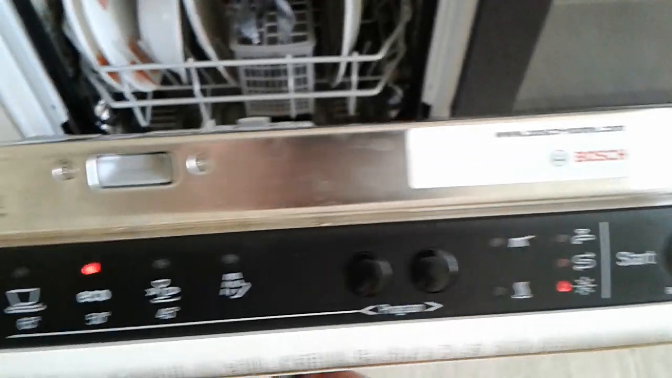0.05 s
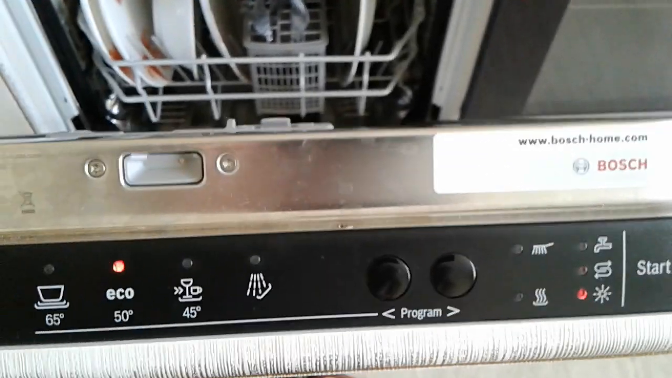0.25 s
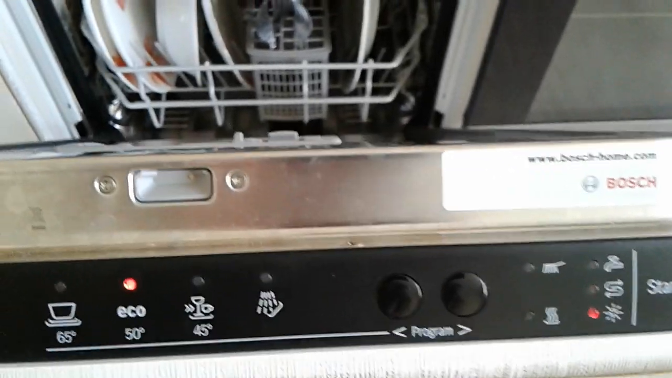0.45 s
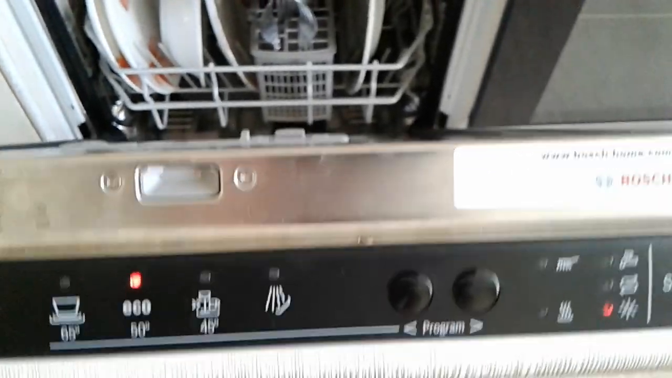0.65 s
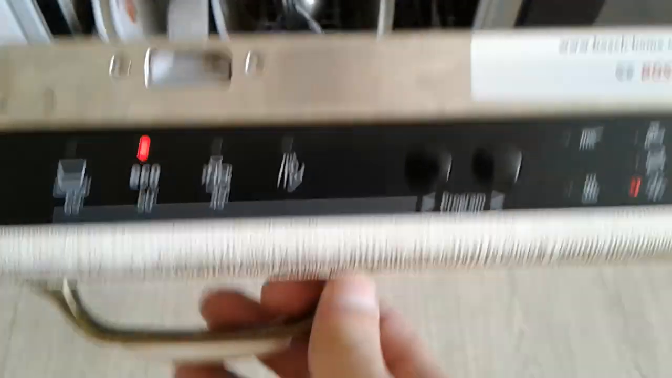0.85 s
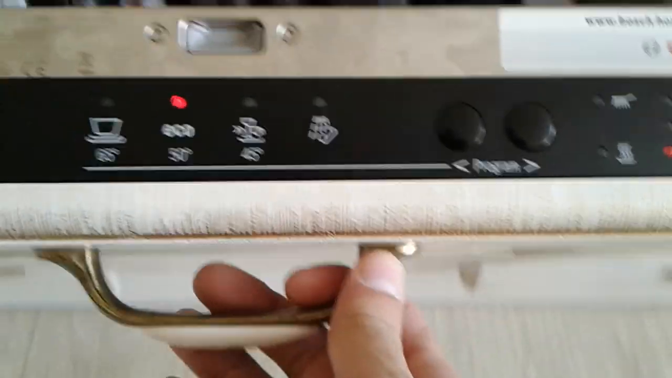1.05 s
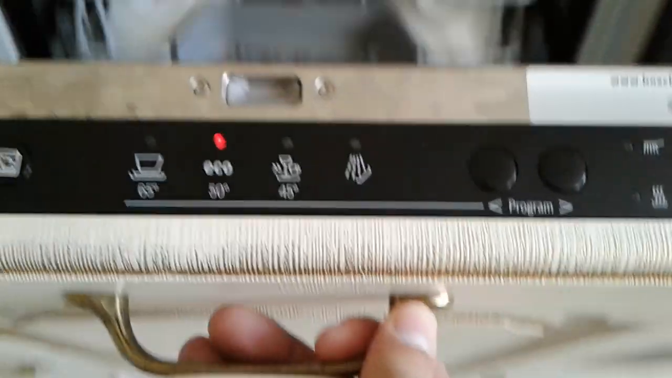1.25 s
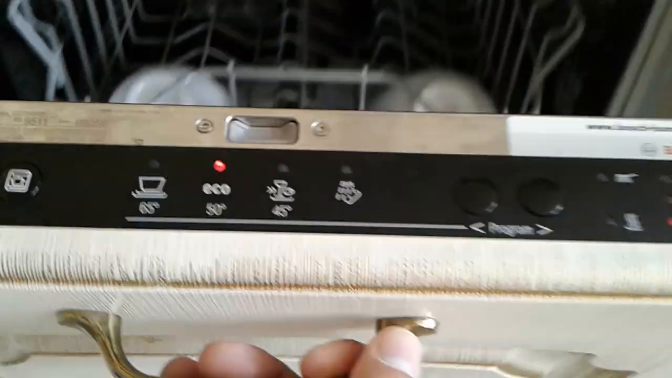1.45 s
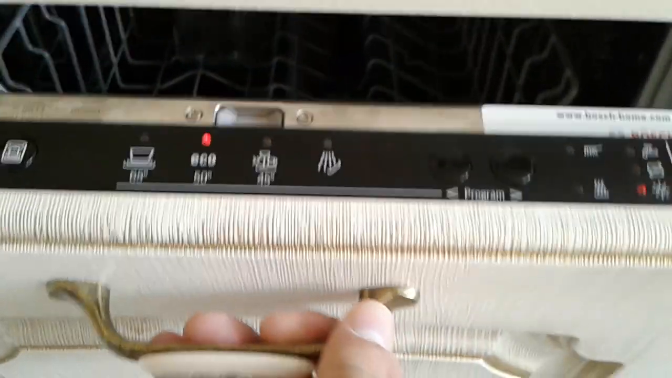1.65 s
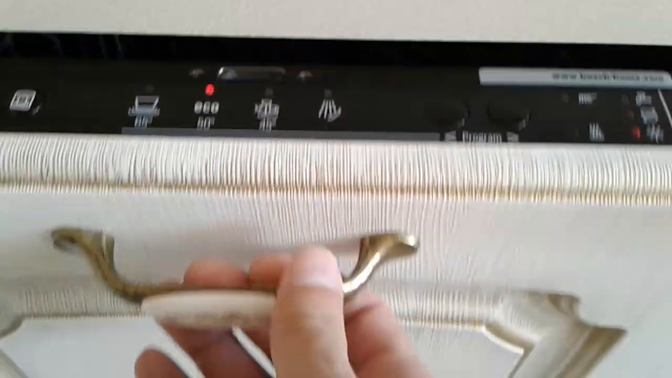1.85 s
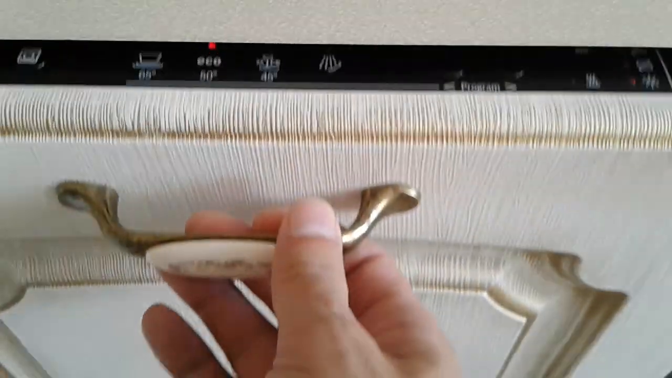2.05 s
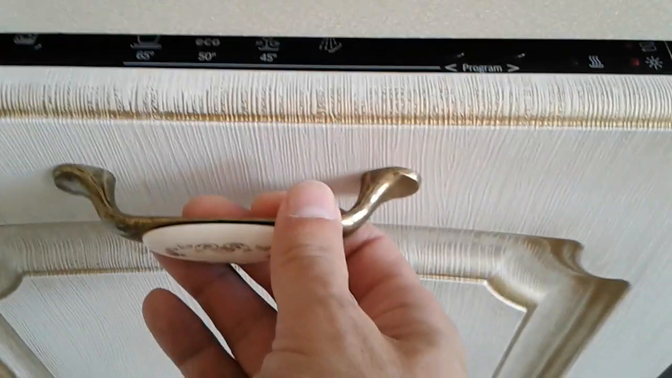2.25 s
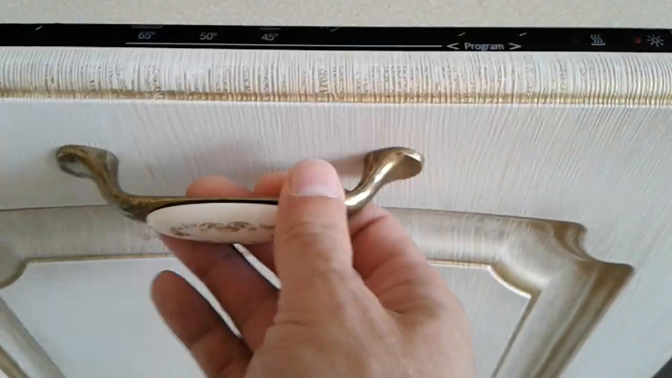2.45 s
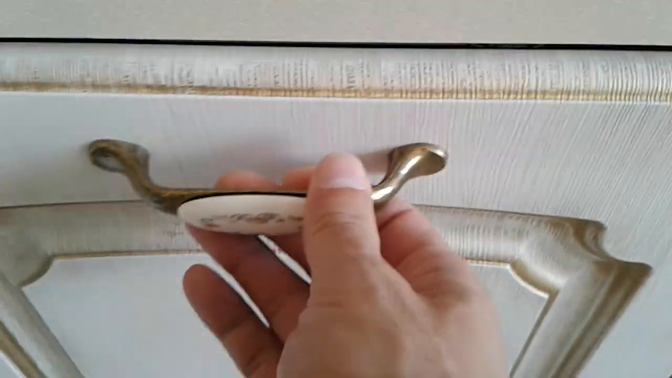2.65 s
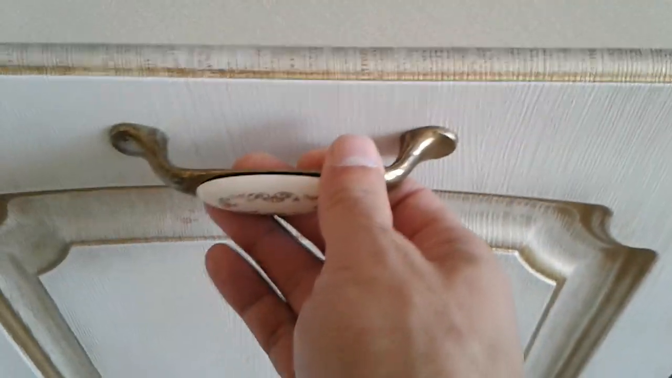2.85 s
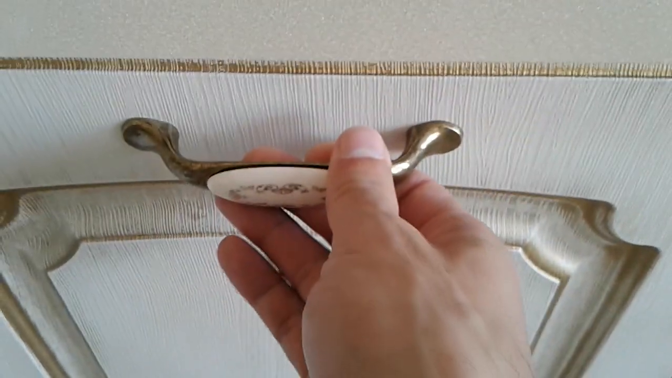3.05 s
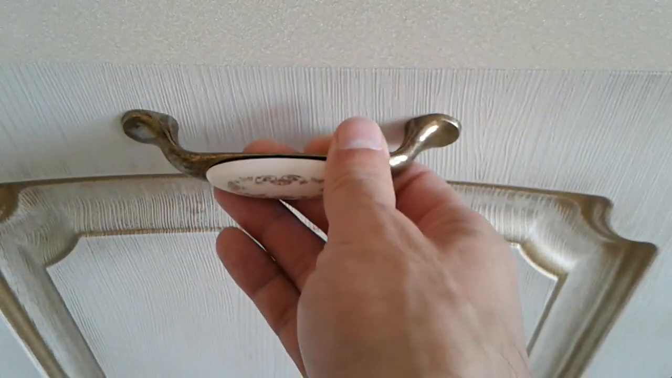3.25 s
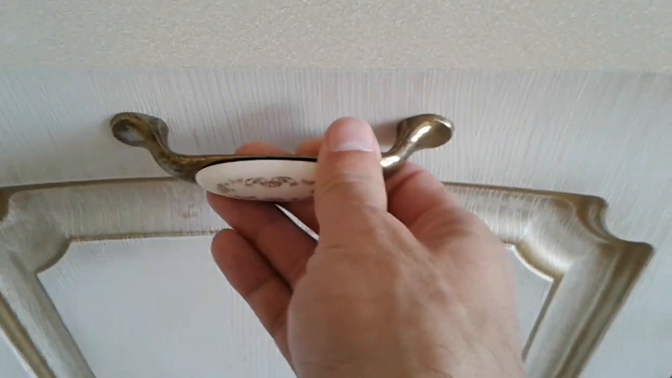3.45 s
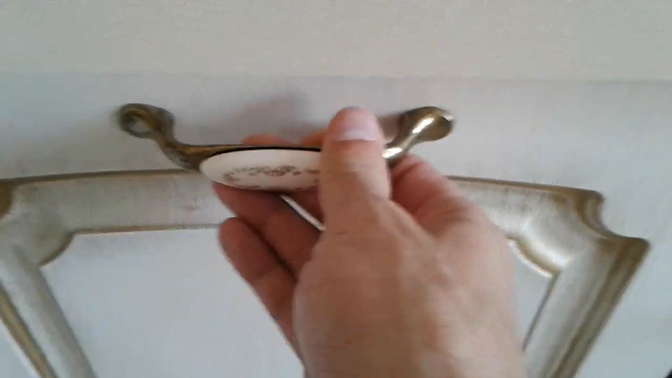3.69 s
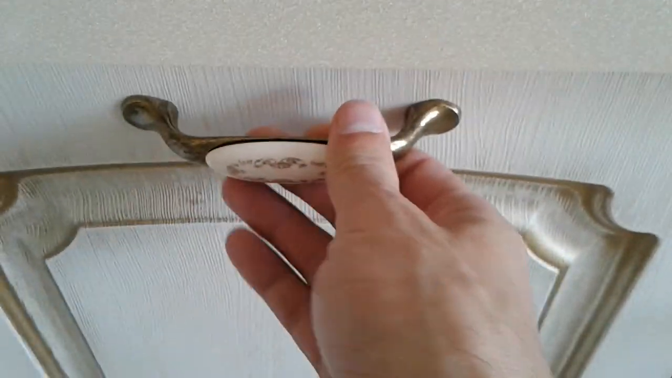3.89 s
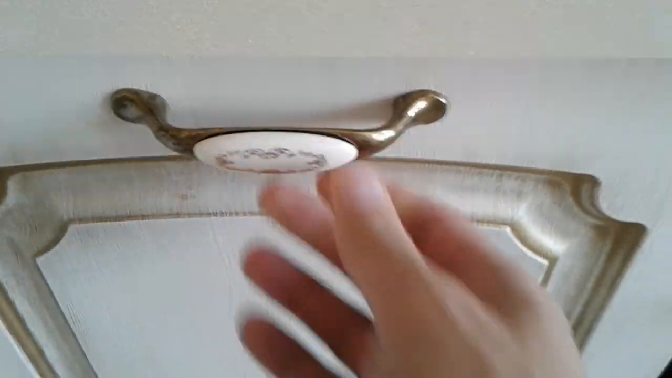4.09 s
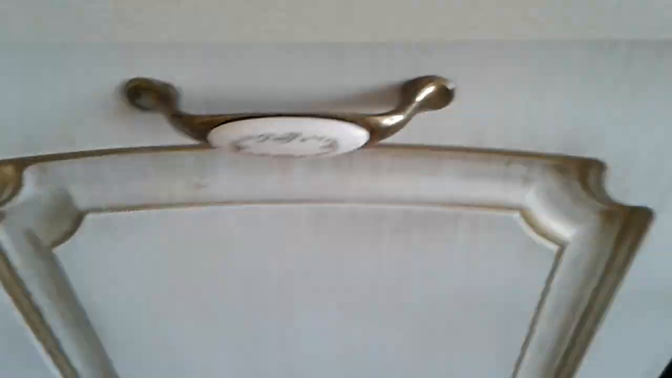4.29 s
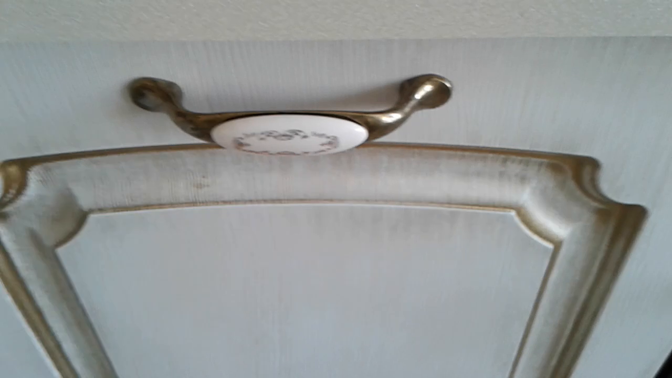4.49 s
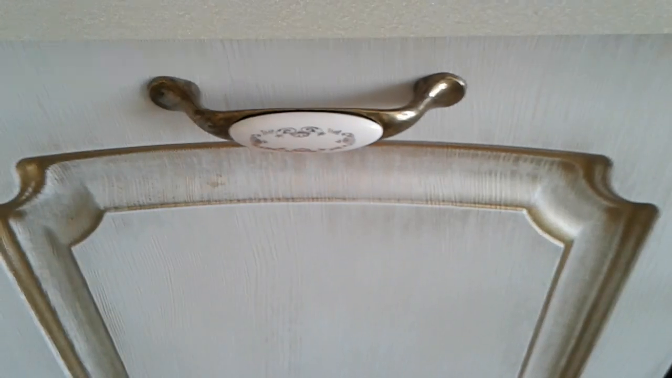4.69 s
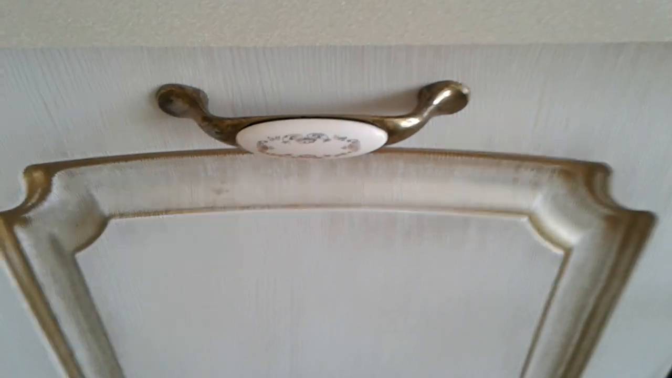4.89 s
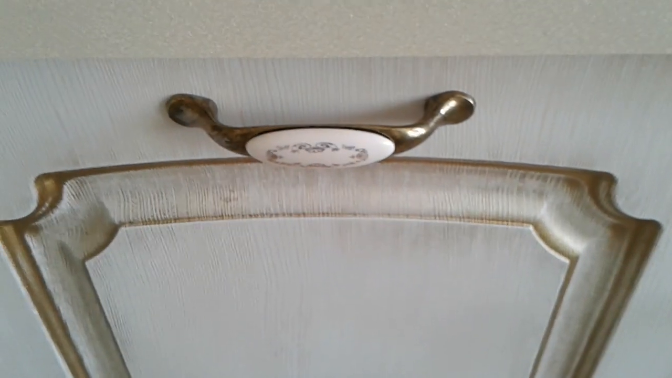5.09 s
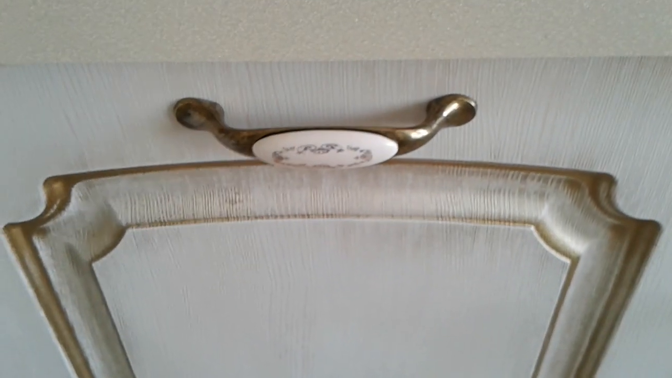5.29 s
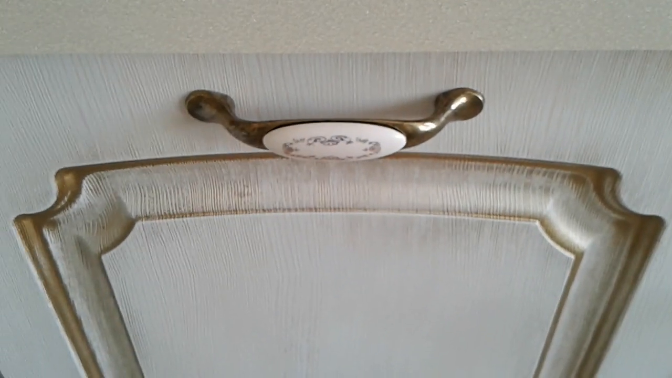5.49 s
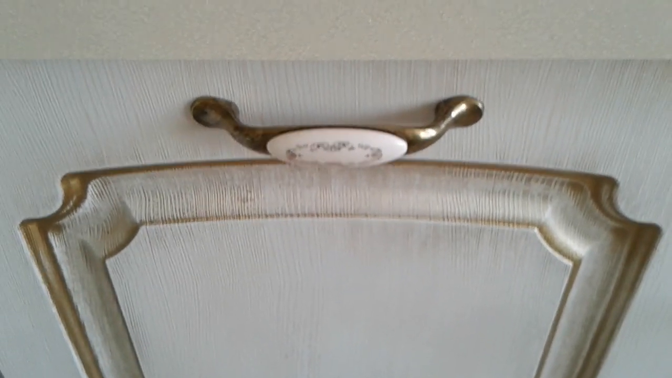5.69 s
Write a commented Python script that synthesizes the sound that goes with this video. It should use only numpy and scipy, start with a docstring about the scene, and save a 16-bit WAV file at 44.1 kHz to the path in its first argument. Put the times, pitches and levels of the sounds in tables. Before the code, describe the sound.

Dull double thump on a door panel, quiet creaky bumps, then a hard latch snap and booming clank, fading to soft rustles.

```python
"""In a small kitchen, a dishwasher door is lifted by its handle and pushed shut, close to a phone.
Knocks are short falling thumps that ring the panel; catch, racks and handle tick and scrape as tiny impacts.
The latch snaps as brief sines and the door lands as noise bursts that ring the steel tub; racks sway and sing on.
A hand rustles in filtered noise, over wavering hum tones and a shaped rush of air and hiss.
The phone's gain control ducks at loud peaks such as the slam and creeps back."""
import sys
import numpy as np
from scipy import signal
from scipy.fft import rfft, irfft
from scipy.io import wavfile
from scipy.ndimage import minimum_filter1d

SR = 44100
rng = np.random.default_rng(int(sys.argv[2]) if len(sys.argv) > 2 else 0)


def store_wav(level_fs):
    """Save 16-bit WAV to argv[1]."""
    pcm = np.round(np.clip(np.atleast_2d(level_fs), -1, 1) * 32767)
    wavfile.write(sys.argv[1], SR, pcm.T.astype(np.int16))


N = 252693
T = np.arange(N) / SR  # time [s]
RING_T = T[:SR]  # the first second, for room echoes

# the door lands and chatters: (time [s], level [dB], contact length [s], tub ring relative to the blow [dB])
LANDINGS = [(3.5882, 14, 0.0028, -2), (3.6025, 5.5, 0.0088, -4), (3.6127, 10, 0.0033, -2.5),
            (3.6327, 6.5, 0.0034, 0.5), (3.658, 1.5, 0.0015, -0.5), (3.675, -2.5, 0.0015, -5)]
# colour of the landing blows: (frequency [Hz], relative level [dB])
LANDING_COLOUR = [(40, -29), (200, -13), (650, -6), (850, -2), (1050, 5), (1600, 1), (2000, -8.5),
                  (3000, -14.5), (3700, -10.5), (4400, -14), (5200, -10.5), (6600, -21.5), (8800, -15.5),
                  (11500, -37), (15000, -32.5)]
# the latch snaps over: (frequency [Hz], relative level [dB], time to fall 60 dB [s])
SNAP_S = 3.5878
SNAP_MODES = [(1120, 7, .0055), (2940, -3, .004), (4117, 1.5, 0.0033), (5180, 2.5, 0.0027),
              (8644, -1.5, .003), (14580, -12, .002)]
# steel tub and frame: (frequency [Hz], relative level [dB], time to fall 60 dB [s])
TUB_MODES = [(337, -7, .4), (404, -12.5, .3), (458.4, -4.5, 0.23), (530, -11, 0.54), (840, -10.5, .33),
             (954, -6.5, 0.18), (1001, -8, 0.3), (1103, -4, 0.19), (1118.5, 2, 0.33), (1218, -9.5, 0.37),
             (1326, -3.5, 0.35), (1380, -8, .27), (1417.4, 2.5, .28), (1447, -4.5, 0.38), (1555, -11, .28),
             (1690, -13.5, .23), (1834, -17, .3), (2040, -13, 0.33), (2670, -17, .35), (3600, -13, .38),
             (4070, -14.5, 0.25), (5060, -14.5, .27), (5340, -23.5, .36)]
# the whole cabinet rocks in its niche: (frequency [Hz], level [dB], time to fall 60 dB [s])
CABINET_S = 3.603
CABINET_MODES = [(40.77, -29, .26), (50.1, -30, 0.21), (75.4, -35, 0.75), (109.3, -23, 0.37),
                 (162.5, -40, 0.94), (260.1, -22.5, .3)]


def slam(tub_db=0.0, snap_rise_s=.001, snap_db=5, wet_db=0.06):
    """The latch snaps over and the door lands; every blow rings the steel tub, and the cabinet rocks."""
    force, snap, body = np.zeros((3, N))
    add(snap, SNAP_S, undb(snap_db) * ring(SNAP_MODES, snap_rise_s))
    for s, db, length, ring_db in LANDINGS:
        add(force, s, undb(db) * contact(length))
        tub_ring = unit(ring(TUB_MODES, scatter=0.96))
        add(body, s, undb(db + ring_db + tub_db) * tub_ring)
    add(body, CABINET_S, ring(CABINET_MODES, rise_s=0.0067))
    landing = through(force, colour(LANDING_COLOUR))
    return kitchen(snap + landing, wet_db) + body


# dull blows on the door: (time [s], level [dB], pitch [Hz], rattle relative to the blow, before a shared boost [dB])
BLOWS = [(0.668, -13, 458, -28), (.6755, -25.5, 628, -22), (0.6956, -8.5, 432, -27.5),
         (0.754, -37, 390, -5.5), (2.163, -46, 700, 3), (2.1688, -30.5, 548, -5.5), (2.187, -34, 1240, 0),
         (2.1919, -23, 185, -22.5), (2.2078, -20, 322, -26), (2.907, -39, 1047, -28), (3.22, -54, 700, 0),
         (3.256, -40, 904, -5.5), (3.290, -33, 187, -16), (3.6112, -3, 190, -17.5),
         (4.632, -44.5, 1075, -15), (4.682, -44, 520, -19), (4.731, -43, 471, -17), (4.899, -41, 1057, -12)]
# colour of the loose parts: (frequency [Hz], relative level [dB])
RATTLE_COLOUR = [(80, -8.5), (300, -0.5), (650, 2), (1250, 0.5), (2200, -8), (3100, -12.5), (4200, -28),
                 (9000, -40), (15000, -50.5)]
# door panel: (frequency [Hz], relative level [dB], time to fall 60 dB [s])
PANEL_MODES = [(42.3, -34.5, 2.5), (89, -11.5, 0.66), (116.5, -2, 0.36), (225.6, 2, .18),
               (304.4, 1.5, 0.31), (399, -1.5, 0.092), (433, -8, .28), (483, -14, 0.58), (541, -4, 0.24),
               (612, -5, 0.16), (697, -3, 0.12), (1186, -9, 0.15), (1566, -14, 0.24)]
# a middling blow has this pitch and level; its thump falls 60 dB in THUMP_T60_S and rings the panel at PANEL_DB
MIDDLE_HZ, MIDDLE_DB = 420, -25
# lower, softer blows last longer and ring the panel more for their strength
THUMP_T60_S, THUMP_T60_POWER, THUMP_DOUBLING_DB = .027, 0.47, 22
PANEL_DB, PANEL_DB_PER_OCTAVE, PANEL_DB_PER_DB = -25.5, -3, -0.1
# the door rebounds after each blow, weaker and lower every time
REBOUND_S, REBOUND_DB, REBOUND_OCTAVES = .0145, -15, -0.018


def knocks(rattle_s=0.012, rattle_db=18, spring_db=-5.0, spring_t60=6.3, lean_hz=75, wet_db=-4.5, count=3):
    """Blows and rebounds thump and shake loose parts; the panel rings and the door springs shiver on."""
    thumps, panel, loose = np.zeros((3, N))
    panel_ring = ring(PANEL_MODES, rise_s=.004)
    for s, db, hz, loose_db in BLOWS:
        pitch_db = PANEL_DB_PER_OCTAVE * np.log2(hz / MIDDLE_HZ)
        strength_db = PANEL_DB_PER_DB * (db - MIDDLE_DB)
        add(panel, s, undb(db + PANEL_DB + pitch_db + strength_db) * panel_ring)
        softness = 2 ** ((MIDDLE_DB - db) / THUMP_DOUBLING_DB)
        for k in range(count):  # the blow itself, then its rebounds
            at = s + k * REBOUND_S
            blow_db = db + k * REBOUND_DB
            pitch = hz * 2 ** (k * REBOUND_OCTAVES)
            t60 = THUMP_T60_S * (MIDDLE_HZ / pitch) ** THUMP_T60_POWER * softness
            # a soft contact builds up within a cycle
            add(thumps, at, ring([(pitch, blow_db, t60)], rise_s=0.66 / pitch))
            add(loose, at, undb(blow_db + loose_db + rattle_db) * contact(rattle_s))
    # a panel radiates little bass
    thumps = signal.sosfilt(signal.butter(2, lean_hz, "high", fs=SR, output="sos"), thumps)
    rattle = through(loose, colour(RATTLE_COLOUR))
    shiver = unit(rng.standard_normal(N) * undb(-60 * T / spring_t60))
    stretched = np.interp(T, [1.2, 2.2], [1, .15])  # the springs slacken as the door rises
    springs = through(stretched * (rattle + undb(-11.5) * thumps), shiver)
    return kitchen(thumps + rattle, wet_db) + panel + undb(spring_db) * springs


# light clicks of catch, racks and handle:
# (time [s], level before a shared boost [dB], scrape length [s], ring frequency [Hz])
TICKS = [(0.752, -37, 0.033, 2800), (1.05, -41.5, 0.04, 2930), (1.436, -38, 0.044, 8580),
         (1.752, -42, 0.054, 8060), (2.192, -40.5, 0.046, 4580), (3.264, -46, 0.005, 8800),
         (3.2900, -20.5, .0012, 1499), (3.988, -41, 0.044, 4180), (4.63, -41, 0.013, 4100),
         (4.896, -38, .014, 2100), (5.075, -45.5, 0.037, 3980)]
# colour of the clicks: (frequency [Hz], relative level [dB])
TICK_COLOUR = [(60, -6.5), (300, -2), (900, -0.5), (1400, 5), (2200, 1), (5500, -2), (7000, -9), (9000, -5),
               (11500, -31.5), (15000, -17.5)]
# a contact much shorter than CLEAN_S is nearly one clean stroke; a longer one scrapes and rings less
CLEAN_S, CLICK_RING_DB, CLICK_RING_DB_PER_S = 0.0027, -3.5, -170


def clicks(force_db=6, ring_t60=0.006, wet_db=-3.5):
    """Small hard parts tick and scrape, each with a brief ring of its own."""
    out, tone = np.zeros(N), colour(TICK_COLOUR)
    for s, db, length, hz in TICKS:
        stroke = np.exp(-length / CLEAN_S)  # share of the energy in one clean stroke
        force = np.sqrt(1 - stroke) * contact(length)
        force[0] += np.sqrt(stroke)
        add(out, s, undb(db + force_db) * through(force, tone))
        ring_db = db + force_db + CLICK_RING_DB + CLICK_RING_DB_PER_S * length
        own_ring = unit(ring([(hz, 0, ring_t60)]))
        add(out, s, undb(ring_db) * through(force, own_ring))
    return kitchen(out, wet_db)


# wire racks and crockery sing on faintly: (frequency [Hz], relative level [dB], time to fall 60 dB [s])
RACK_MODES = [(1090, -69.5, 4), (1440, -61, 2.1), (1970, -64.5, 4.3), (2040, -65.5, 2.3), (2740, -67, 2.3),
              (9903, -77, 2.8)]
# the racks sway to and fro after the slam, dying away; every swing rumbles and jingles the wires
SWAY_START_S, SWAY_PERIOD_S = 3.752, 0.0968
SWAY_DB, SWAY_DB_PER_S = -47.5, -30
JINGLE_DB, JINGLE_DB_PER_S = -65, -8


def sways(sway_s=0.091, boom_low_hz=68, boom_high_hz=105, wire_low_hz=1400, wire_high_hz=2600,
          flutter_db=4, song_db=-1, count=8):
    """Each swing of the racks swells soft rumble and jingle noise; the wires sing on unsteadily."""
    boom, shake, song = np.zeros((3, N))
    swell = np.hanning(int(sway_s * SR))
    for age in SWAY_PERIOD_S * np.arange(count):
        add(boom, SWAY_START_S + age, undb(SWAY_DB + SWAY_DB_PER_S * age) * swell)
        add(shake, SWAY_START_S + age, undb(JINGLE_DB + JINGLE_DB_PER_S * age) * swell)
    add(song, CABINET_S, ring(RACK_MODES, rise_s=0.01))
    rumble = boom * band_noise(boom_low_hz, boom_high_hz)
    jingle = shake * band_noise(wire_low_hz, wire_high_hz)
    return rumble + jingle + song * undb(song_db + flutter_db * walk(34))


# the hand rustles in uneven strokes: (start time [s], end time [s], level before the unevenness [dB])
RUBS = [(2.35, 2.851, -81), (4.4, 5.7, -79.5)]


def rustles(low_hz=1900, high_hz=2800, grain_db=3, stroke_db=3, strokes_per_s=8, ease_s=0.056):
    """Skin slides in short, uneven strokes: noise with a slow and a fast random swell."""
    pressure = np.zeros(N)
    for start, end, db in RUBS:
        pressure += undb(db) * np.clip(np.minimum(T - start, end - T) / ease_s, 0, 1)
    unevenness = undb(stroke_db * walk(strokes_per_s) + grain_db * walk(60))
    return pressure * unevenness * band_noise(low_hz, high_hz)


# colour of room rush and microphone hiss: (frequency [Hz], relative level [dB])
AIR_COLOUR = [(25, -22), (55, -18.5), (90, -6.5), (140, -7.5), (280, -1), (450, -7.5), (800, -13.5),
              (1500, -19.5), (2600, -21), (4000, -27), (8300, -30), (11200, -41), (15500, -33.5)]
AIR_DB = -60
# hum of a kitchen appliance: (frequency before drift [Hz], rms level before wavering [dB])
HUM_TONES = [(144, -71.5), (232, -73.5), (287, -70), (430.5, -73), (606, -77), (7133, -93.5), (8016, -93.5),
             (8301, -92)]


def background(air_db=-0.9, waver_db=4.0, drift_hz=3.3):
    """Room rush and microphone hiss as shaped noise; a hum of tones that drift in pitch and level."""
    air = through(rng.standard_normal(N), colour(AIR_COLOUR))
    hum = np.zeros(N)
    for hz, db in HUM_TONES:
        level = np.sqrt(2) * undb(db + waver_db * walk(7))
        cycles = np.cumsum(hz + drift_hz * walk(14)) / SR
        hum += level * np.sin(2 * np.pi * cycles)
    return undb(AIR_DB + air_db) * air + hum


# echoes of the kitchen: (frequency [Hz], time to fall 60 dB [s])
ECHO_DECAY = [(60, 0.44), (250, 0.44), (1000, 0.38), (3000, 0.39), (8000, 0.34), (12000, 0.19),
              (16000, .28)]


def kitchen(x, wet_db, build_s=0.0052, bass_hz=130):
    """Dense echoes off tiles and cupboards build up quickly and die band by band."""
    noise = rfft(rng.standard_normal(len(RING_T)))
    hz = np.arange(len(noise)) * SR / len(RING_T)
    noise = noise * hz / np.hypot(hz, bass_hz)  # the close door dominates the deep bass
    centres = [f for f, _ in ECHO_DECAY]
    tail = np.zeros(len(RING_T))
    # each share is 1 at its own centre and 0 at the others, so neighbouring bands crossfade
    for share, (_, t60) in zip(np.eye(len(ECHO_DECAY)), ECHO_DECAY):
        band = irfft(noise * on_log_axis(list(zip(centres, share)), hz))
        tail += band * undb(-60 * RING_T / t60)
    echoes = unit(tail * (1 - np.exp(-RING_T / build_s)))
    return x + undb(wet_db) * through(x, echoes)


def undb(db):
    """Decibels to gain."""
    return np.exp(np.asarray(db) * np.log(10) / 20)


def unit(x):
    """Scale to an energy of one."""
    return x / np.sqrt(np.sum(x ** 2))


def on_log_axis(points, hz):
    """Read (frequency [Hz], value) points at any frequency."""
    at, value = np.transpose(points)
    return np.interp(np.log(np.maximum(hz, 1)), np.log(at), value)


def through(x, response):
    """Pass a sound through an impulse response."""
    return signal.fftconvolve(x, response)[:N]


def add(track, s, sound):
    """Mix a sound into a track at a time in seconds."""
    i = int(s * SR)
    track[i:i + len(sound)] += sound[:N - i]


def colour(points, size=4096):
    """Causal response with the given spectrum and its energy as early as possible, scaled to energy one."""
    cepstrum = irfft(np.log(undb(on_log_axis(points, np.arange(size // 2 + 1) * SR / size))))
    # folding the cepstrum forward makes the response minimum-phase
    cepstrum[1:size // 2] *= 2
    cepstrum[size // 2 + 1:] = 0
    return unit(irfft(np.exp(rfft(cepstrum))))


def fade(t60):
    """Exponential decay of 60 dB in t60 seconds, followed on to 90 dB."""
    return np.exp(-np.log(1000) * T[:int(t60 * SR * 3 / 2)] / t60)


def ring(modes, rise_s=1e-6, scatter=0):
    """Damped sines that build up over rise_s; scatter (cycles) starts each at its own phase."""
    parts = [undb(db) * fade(t60) for _, db, t60 in modes]
    out = np.zeros(max(map(len, parts)))
    for (hz, _, _), part in zip(modes, parts):
        cycles = hz * T[:len(part)] + scatter * rng.random()
        out[:len(part)] += part * np.sin(2 * np.pi * cycles)
    return out * -np.expm1(-T[:len(out)] / rise_s)


def contact(length, size=16384):
    """Rough surfaces meet: a burst of tiny impacts, energy one."""
    return unit(rng.standard_normal(size) * np.exp(-np.minimum(T[:size] / length, 20)))


def walk(rate, size=1024):
    """Random drift, a new value rate times a second, with a spread near one."""
    return np.interp(T * rate, np.arange(size), rng.standard_normal(size))


def band_noise(low_hz, high_hz):
    """Noise between two frequencies, with a spread of one."""
    band = signal.butter(2, [low_hz, high_hz], "band", fs=SR, output="sos")
    noise = signal.sosfilt(band, rng.standard_normal(N))
    return noise / noise.std()


def scene():
    """Door, hand and room at one microphone."""
    return (slam() + knocks() + clicks() + sways() + rustles() + background())[None]


def gain_control(x, ceiling_db=-2.14, hold_s=1.085, release_s=0.32):
    """Turn down at once for a peak over the ceiling, hold, then creep back."""
    over_db = np.maximum(20 * np.log10(np.abs(x) + 1e-9) - ceiling_db, 0)
    half = int(hold_s * SR / 2)
    # the largest overshoot within the past hold_s
    held = -minimum_filter1d(-over_db, 2 * half + 1, origin=half, mode="constant")
    recovery = np.exp(-T / release_s)
    cut_db = np.maximum.accumulate(held / recovery) * recovery
    return x * undb(-cut_db)


TOP_HZ = 15900


def record(dry):
    """The phone drops the deepest rumble, rides its gain and cuts the top."""
    rumble_cut = signal.butter(4, 34, "high", fs=SR, output="sos")
    x = gain_control(signal.sosfilt(rumble_cut, dry[0]))
    top_cut = signal.ellip(10, .2, 70, TOP_HZ, fs=SR, output="sos")
    return signal.sosfilt(top_cut, x)[None]


dry = scene()
out = record(dry)
store_wav(out)
```